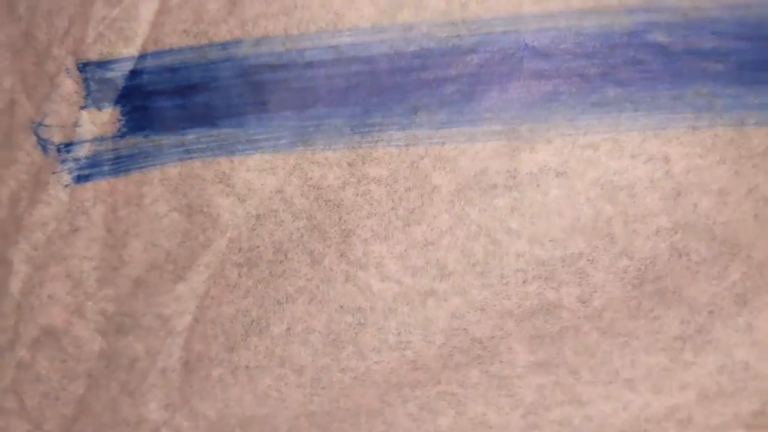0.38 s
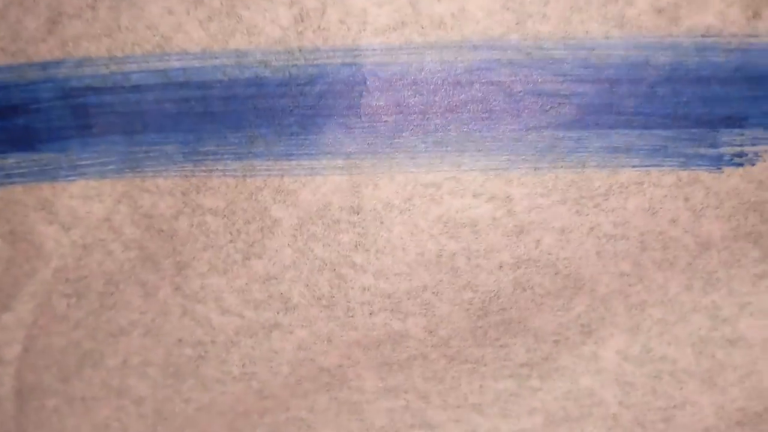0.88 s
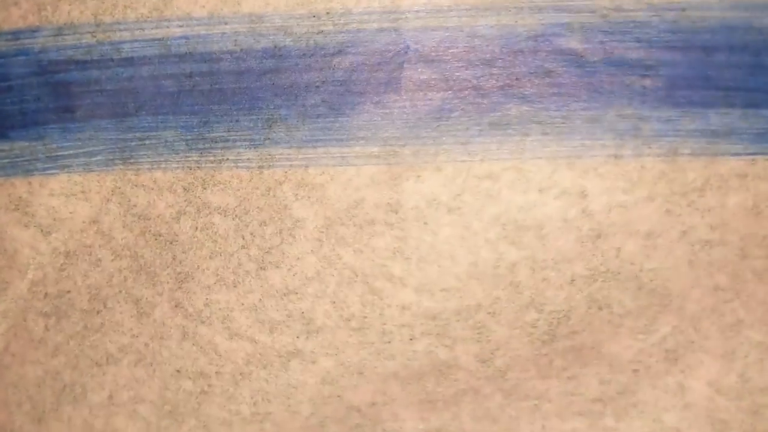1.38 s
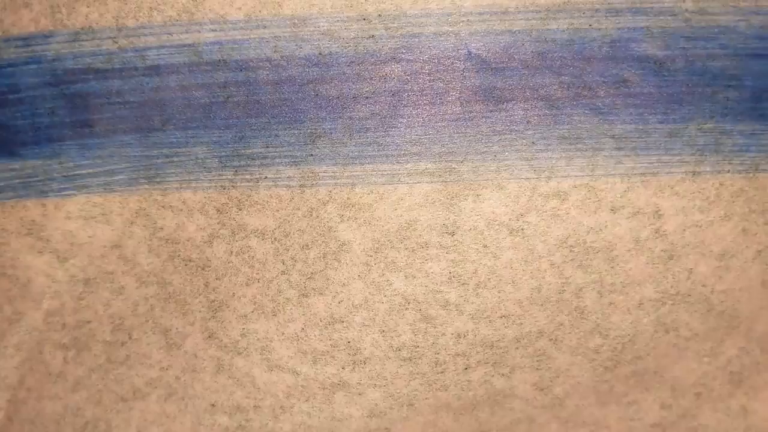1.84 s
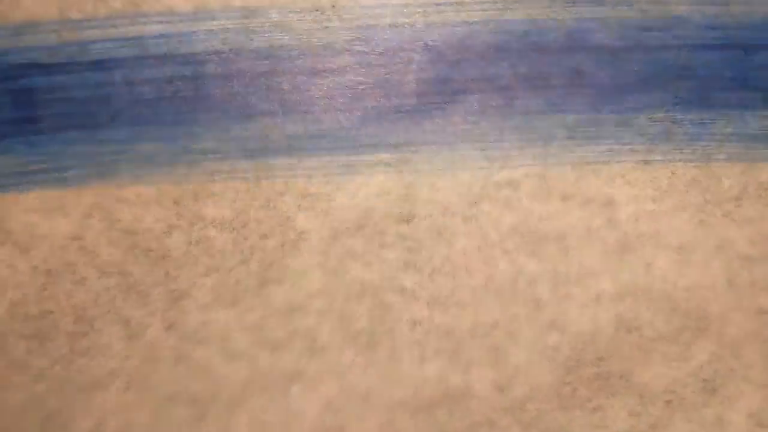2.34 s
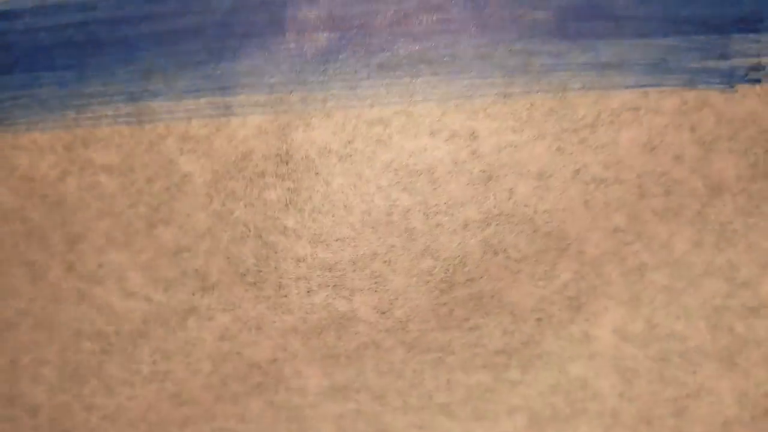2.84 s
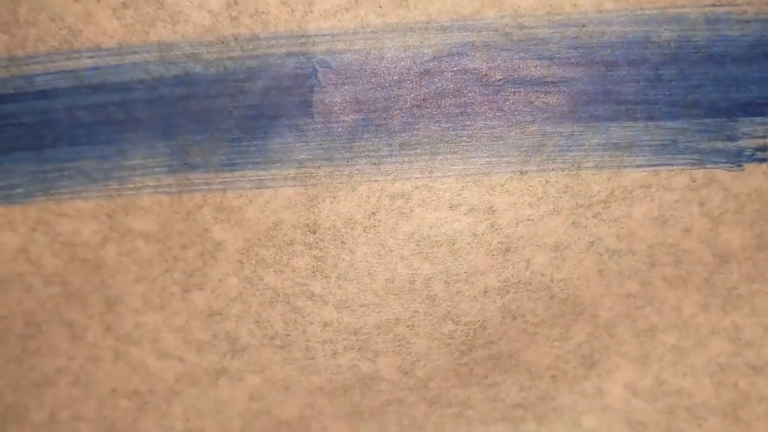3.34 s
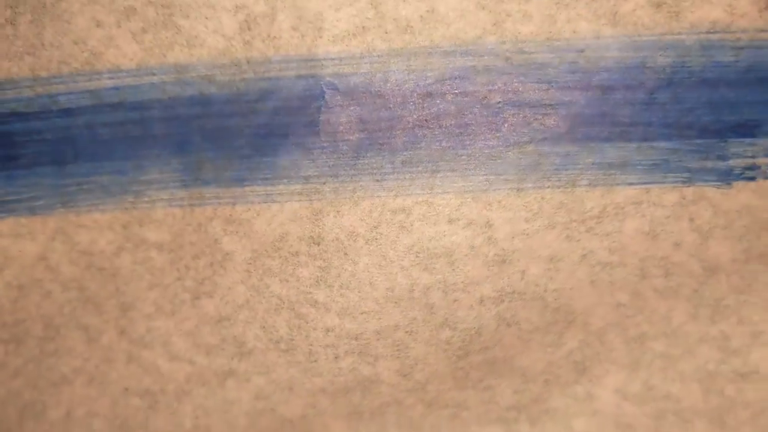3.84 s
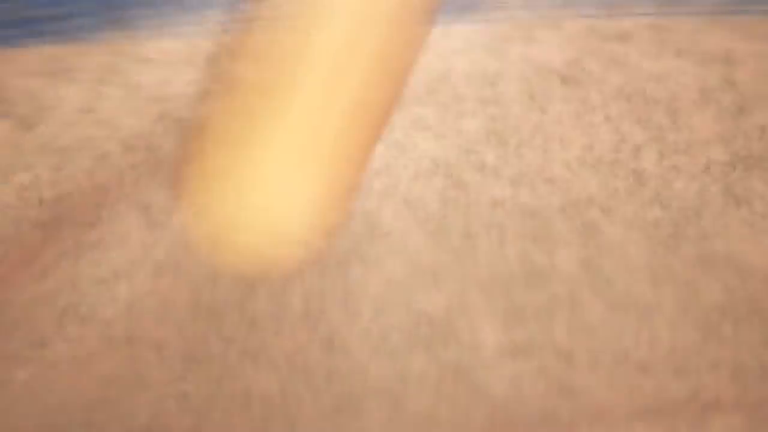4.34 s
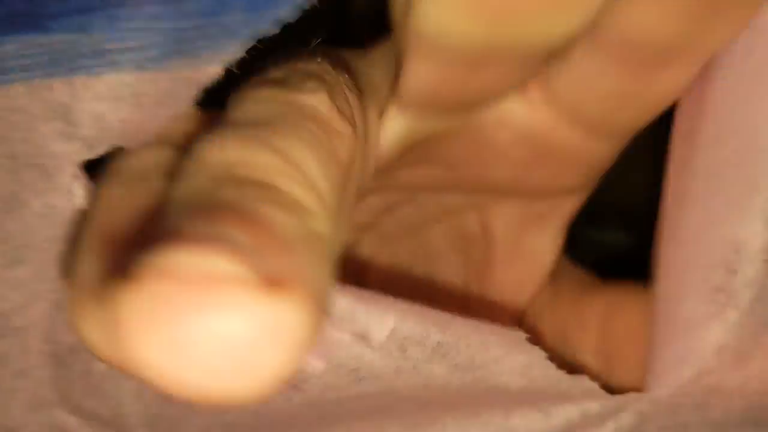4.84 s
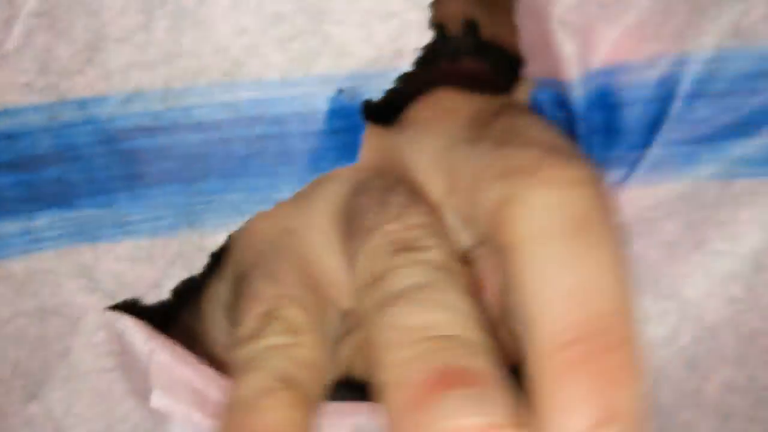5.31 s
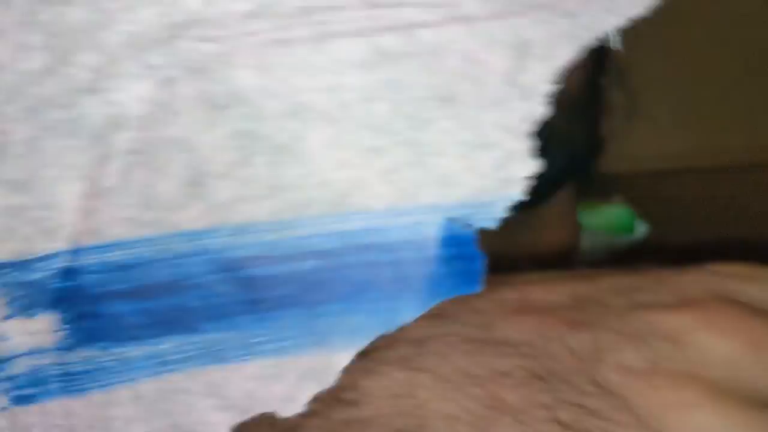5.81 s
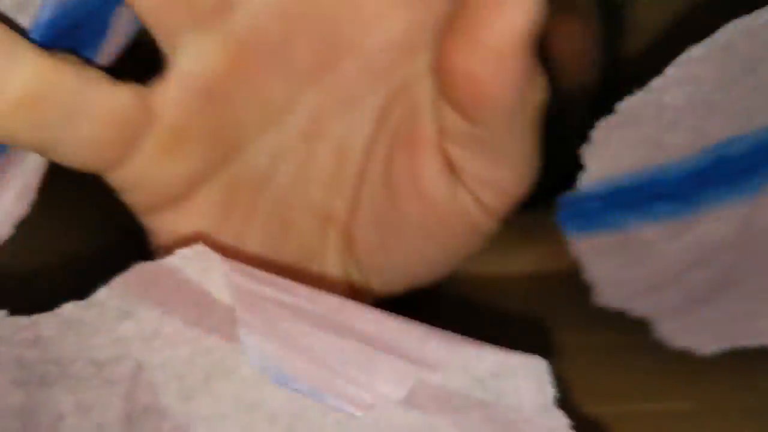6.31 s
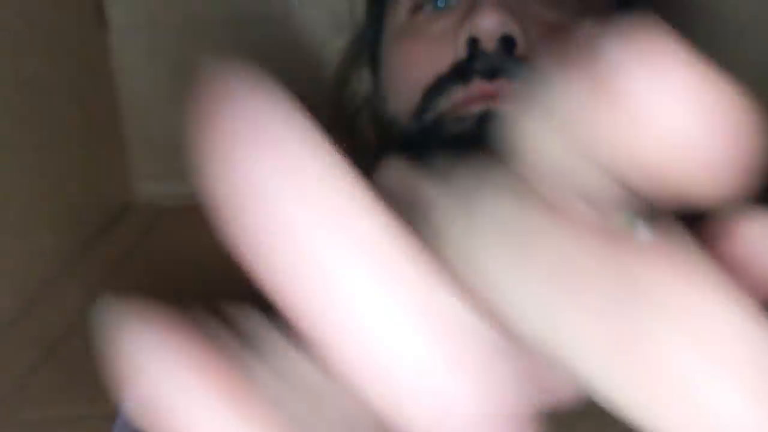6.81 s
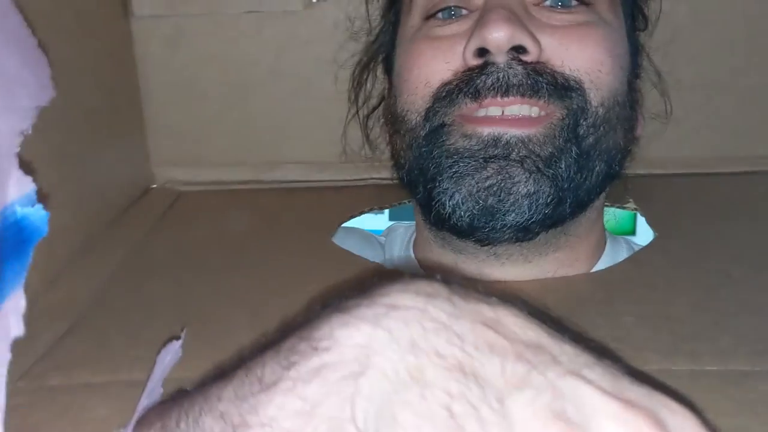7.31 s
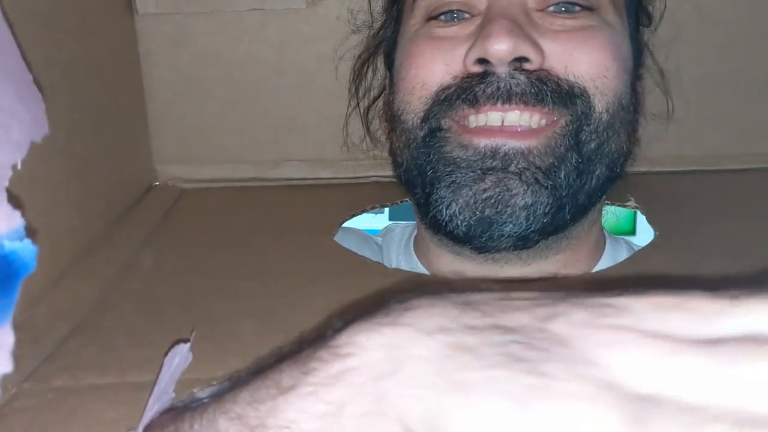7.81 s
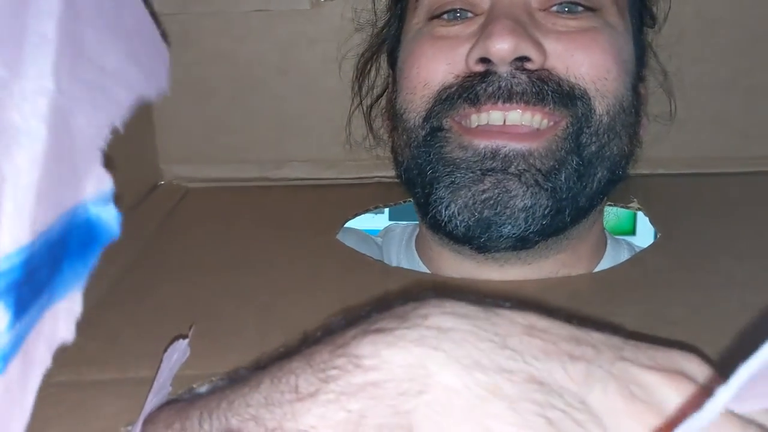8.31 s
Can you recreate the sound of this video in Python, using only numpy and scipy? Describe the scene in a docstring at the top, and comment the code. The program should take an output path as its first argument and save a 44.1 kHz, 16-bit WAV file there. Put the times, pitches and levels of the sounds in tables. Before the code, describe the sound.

Crisp paper crackle and tiny clinks give way to fuller tearing, a short hush, then violent rips and dull box thumps, ending in quiet rustles.

```python
"""Thin paper stretched over a cardboard box is handled right at a pair of microphones.
First it crinkles thinly while something small and hard clinks nearby; then the sheet slackens and
tears more broadly, and after a lull the tearing grows loud and the box booms along. The paper is
thousands of tiny noise clicks that follow the hand's moves, with snaps and dry ticks on top; clinks and
bumps are decaying tones. Short echoes of the box, a low rumble and the quiet room lie around it."""
import sys
import numpy as np
from scipy import signal
from scipy.fft import rfft, irfft
from scipy.io import wavfile

SR = 44100
rng = np.random.default_rng(int(sys.argv[2]) if len(sys.argv) > 2 else 0)


def field_ratio(decibels):
    """Amplitude ratio for a level in dB (20 dB per decade); scalars and array-likes work."""
    return 10 ** (np.asarray(decibels, dtype=float) / 20)


def wav_record(signal):
    """Record a signal, one row per channel, as 16-bit PCM in the file named by sys.argv[1]."""
    frames = np.transpose(np.atleast_2d(signal))
    bounded = np.clip(frames, -1, 1)
    # unit amplitude maps onto the largest positive 16-bit level
    quanta = np.round(bounded * 32767).astype(np.int16)
    wavfile.write(sys.argv[1], SR, quanta)


N = 371189  # length in samples

# creases that give way at once: (time [s], relative level [dB], pitch [Hz])
SNAP_EVENTS = [(0.018, -3.5, 7000), (0.1048, -7, 6500), (0.1507, -8, 6500), (0.438, -10.5, 5540),
               (0.553, -18, 6230), (0.5939, -11, 6800), (0.785, -17.5, 6200), (0.925, -13, 5850),
               (0.958, -11.5, 5500), (1.1764, -16.5, 5200), (1.238, -19, 6400), (1.5483, -5, 5350),
               (1.6216, -8, 5140), (1.6554, -5, 3220), (1.6944, -6.5, 6400), (1.768, -10, 6240),
               (1.878, -26.5, 4700), (2.3374, -12, 2290), (2.367, -2.5, 1500), (3.1615, -20, 2220),
               (3.895, -23.5, 3900), (3.9763, -20, 1870), (4.0617, -22, 1660), (4.4179, -4, 3460),
               (4.758, -7, 2630), (5.108, -13, 3230), (5.943, -6, 2360), (6.058, -22, 4530),
               (7.4792, -23.5, 3400), (7.8246, -17.5, 2577), (7.8992, -15.5, 3280)]
# single fibres that part with a dry tick: (time [s], relative level [dB])
TICK_EVENTS = [(0.1974, -11), (1.5978, -12), (2.1839, -15), (2.2084, -14), (2.2408, -12), (2.3101, -16),
               (2.4488, -12), (2.4982, -15), (5.2714, -22), (5.4424, -14), (5.4614, -16), (5.4879, -14),
               (5.5468, -13), (6.4872, -13), (7.2823, -17), (7.2993, -14), (7.7558, -14)]
# small hard clinks: (time [s], relative level [dB], pitch the blow favours [Hz])
CLINK_EVENTS = [(.122, -31.5, 1960), (0.118, -22, 3185), (0.36, -46, 1350), (0.44, -28, 3185),
                (.965, -27.5, 2340), (.965, -33, 3760), (1.11, -34, 2850), (1.18, -31.5, 2850),
                (1.301, -41, 2850), (1.553, -37, 1960), (1.651, -21.5, 3185), (1.653, -32, 1960),
                (1.661, -31, 4370), (1.713, -34.5, 1350), (1.769, -32.5, 1960), (1.812, -28, 4370),
                (1.836, -28, 3185), (2.335, -21, 2340), (2.4, -23, 2340)]
# tones of the clinking thing: (pitch [Hz], time to fade by 60 dB [s])
CLINK_TONES = [(1350, 0.16), (1960, 0.13), (2340, 0.063), (2850, 0.058), (3185, 0.11), (3760, 0.069),
               (4370, 0.076)]
# bumps on the box: (time [s], relative level [dB], contact passes up to [Hz], hand rubs on for [s])
BUMP_EVENTS = [(1.256, -36, 72, 0.08), (2.369, -18, 1510, 0.005), (4.147, -37, 147, 0.28),
               (4.418, -13, 800, 0.0052), (4.776, -19, 800, 0.015), (5.08, -26, 500, 0.0042),
               (6.345, -26.5, 407, .17), (7.288, -29, 200, 0.02), (8.18, -33.5, 127.3, 0.03)]
# tones of the box: (pitch [Hz], relative level [dB], time to fade by 60 dB [s])
BOX_TONES = [(29.1, -10, 0.4), (113, -5.5, 0.048), (211, -3.5, 0.055), (431, -6, 0.078)]
# how the sheet is held: (time [s], rustle between moves [dB], left minus right [dB],
# fullness: low crackle against the rustle [dB])
GRIP_CURVE = [(0, -66, -1.5, -27), (.5, -41, -1, -28.5), (.95, -32, -1, -42), (1.35, -46, -1.5, -23),
              (1.9, -38.5, -1.5, -37.5), (2.15, -30.5, 0, -36.5), (2.365, -33, -1.5, -17),
              (2.6, -44.5, 0.5, 1.5), (3.36, -46.5, 2.5, -8), (3.46, -59, 4, -10.5), (3.8, -71, 0, -7.5),
              (4.35, -43, 2.5, -4.5), (5.1, -72, 1.5, -8), (5.85, -68, -1, -8), (6.2, -59, 0.5, -8),
              (6.45, -40, 4, -6.5), (6.62, -81, 1.5, -8.5), (6.95, -58, -0.5, -9), (8.42, -52, -2, -10)]
# where the hand works: (time [s], delay of the left microphone [ms])
HAND_CURVE = [(0, 0.26), (.6, -.2), (6.8, -.25), (7.2, 0.18)]
# pulls that build up gradually: (time of full effort [s], hold [s], rustle level [dB], fall [dB/s])
PULL_MOVES = [(0, 0.14, -26, 164), (.4, 0.0047, -26, 86.5), (.609, 0.0053, -29, 183),
              (.848, 0.042, -34.5, 46), (1.711, 0.0075, -21, 146), (2.06, 0.4675, -29, 1196.5),
              (2.998, 0.0025, -32.5, 150), (4.605, 0.01, -32.5, 48), (4.969, 0.11, -25, 252),
              (5.223, 0.0047, -34, 80), (5.37, 0.03, -32.5, 62), (5.602, 0.00162, -25, 236),
              (7.035, 0.024, -33, 42), (7.58, 0.076, -38.5, 100), (5.855, 0.018, -18, 496),
              (7.752, 0.0078, -32.5, 114), (8, .14, -44, 497)]
# jerks that start almost at once: (time of full effort [s], hold [s], rustle level [dB], fall [dB/s])
JERK_MOVES = [(2.7, 0.14, -33, 500), (2.83, 0.013, -28.5, 529), (3.163, 0.011, -38.5, 491),
              (3.845, .01, -43, 3), (4.158, 0.014, -26, 134), (4.424, 0.0083, -18.5, 182),
              (4.764, 0.023, -16, 700), (4.81, 0.0184, -28.5, 154), (5.418, 0.026, -25, 248),
              (5.758, 0.0055, -19, 900), (5.798, 0.064, -25.5, 77), (5.89, 0.011, -20, 898),
              (5.947, 0.016, -23, 450), (6.062, 0.062, -37, 400), (6.336, 0.0066, -18, 119),
              (6.41, 0.12, -25, 259), (6.942, .05, -40, 30), (7.15, 0.013, -28, 450),
              (7.234, 0.0088, -25, 139), (7.822, 0.029, -28, 204), (7.9, 0.0071, -29.5, 213),
              (8.27, 0.059, -43, 202)]
# spans where the rustle is stronger at 1.5-3 kHz: (start [s], length [s], lift [dB])
MIDDLE_LIFTS = [(0.682, 0.94, 6.5), (2.172, 1.22, 4.5)]
# colour of the sheet crinkling: (frequency [Hz], relative level per Hz [dB])
CRINKLE_COLOUR = [(1500, -17), (2300, -12), (3300, -7.5), (5500, 1), (8000, -5), (11500, -7), (14500, -24),
                  (16500, -28)]
# colour of the sheet tearing: (frequency [Hz], relative level per Hz [dB])
TEAR_COLOUR = [(1500, -1), (3000, -0.5), (5000, -1), (7500, -9), (10500, -0.5), (13500, -8), (16500, -11.5)]
# colour of the low crackle: (frequency [Hz], relative level per Hz [dB])
LOW_CRACKLE_COLOUR = [(200, -1), (350, -5.5), (700, 0), (1500, 0.5)]
# colour of the room at rest: (frequency [Hz], relative level [dB])
HUSH_COLOUR = [(15, -40), (25, 4), (65, -4), (263, -15.5), (16000, -40.5)]

HUSH_DB = -56  # overall level of the room at rest
TAUT_END_S, SLACK_S = 2.2, 2.55  # end of the taut hold; start of the broad tearing colour
TAUT_MEAN_DB, TAUT_LAG = -23, 0.49  # while taut, the low crackle trails the rustle's swings by this share
PULL_RISE_DB_PER_S, JERK_RISE_DB_PER_S = 103, 1100
EVEN_DB, CLUMPY_DB = -20, -39  # rustle levels that set the scale from even to clumpy clicks
LEAD_DB = -5  # the tick that opens a snap, against the snap's listed level
MIC_SPREAD_S = .00025  # largest change of the delay between microphones over the working part of the sheet
LIFT_EDGE_S, LIFT_REST_DB = 0.15, -0.5
BOX_T60_S, BOX_WET_DB = 0.036, -6
RUMBLE_DB, RUMBLE_IGNORES = -9.5, 0.47  # offset of the rumble; share of the fullness that it ignores
SHUDDER_DB, SHUDDER_T60_S = -5, 0.14  # shudder against the bump's listed level
SHUDDER_LOW_HZ, SHUDDER_TOP_HZ = 34.4, 394


def rms_one(x):
    """Scale to an average (rms) strength of 1."""
    return x / np.sqrt(np.mean(x ** 2) + 1e-20)


def in_time(rows):
    """Draw straight lines between the rows of a time table: one value per sample for each column."""
    s, *columns = np.transpose(rows)
    return [np.interp(np.arange(N) / SR, s, c) for c in columns]


def at_hz(points, hz):
    """Read a colour table at hz, with frequency spaced by ratio as the ear hears it."""
    table_hz, table_db = np.transpose(points)
    return np.interp(np.log(hz), np.log(table_hz), table_db)


def band(x, low_hz, high_hz):
    """Let through only the range between two frequencies."""
    sos = signal.butter(2, [low_hz, high_hz], "band", fs=SR, output="sos")
    return signal.sosfilt(sos, x + 1e-18)


def fade(x, t60):
    """Each spike in x leaves a trail that fades by 60 dB in t60 seconds."""
    return signal.lfilter([1], [1, -field_ratio(-60 / (t60 * SR))], x)


def ring(clicks, hz, t60):
    """A struck tone: each click of height 1 starts a fading sine of height 1."""
    r, w = field_ratio(-60 / (t60 * SR)), 2 * np.pi * hz / SR
    return signal.lfilter([0, np.sin(w)], [1, -2 * r * np.cos(w), r * r], clicks + 1e-18)


def hush():
    """The quiet room and the microphones' own hiss: steady noise, alike left and right only in the bass."""
    hz = np.maximum(np.arange(N // 2 + 1) * SR / N, 1)
    mid, side = rfft(rng.standard_normal((2, N)))
    side = side / np.sqrt(1 + (700 / hz) ** 2)
    spectrum = (mid + side * [[1], [-1]]) * field_ratio(at_hz(HUSH_COLOUR, hz))
    return field_ratio(HUSH_DB) * rms_one(irfft(spectrum, N))


def rumble(low_db, apart, lag_s):
    """Low noise that follows the handling sluggishly, mostly shared by both microphones."""
    r = np.exp(-1 / (lag_s * SR))
    level = signal.lfilter([1 - r], [1, -r], field_ratio(low_db))
    mid, side = rng.standard_normal((2, N))
    deep = rms_one(band(mid + apart * side * [[1], [-1]], 33.6, 38.5))
    boom = rms_one(band(mid + apart / 2 * side * [[1], [-1]], 64, 185))
    return level * rms_one(deep + 0.92 * boom)


def box(x):
    """Dense short echoes between the cardboard walls, in a new random pattern every twelfth of a second."""
    step, t = SR // 12, np.arange(SR // 8) / SR
    out = np.zeros((2, N + step + len(t)))
    for i in range(0, N, step):
        echoes = rng.standard_normal((2, len(t))) * field_ratio(-60 * t / BOX_T60_S) * (t > .001)
        echoes = echoes / np.linalg.norm(echoes, axis=1, keepdims=True)
        wet = signal.fftconvolve(x[:, i:i + step], echoes, axes=1)
        out[:, i:i + wet.shape[1]] += wet
    return out[:, :N]


def bump_tones(level_db, apart):
    """Dull blows ring the walls and air of the box; a soft contact hardly reaches the high tones."""
    s, bump_db, soft_hz, rub_s = np.transpose(BUMP_EVENTS)
    chance = rng.standard_normal((len(BOX_TONES), 2, len(s)))
    at, side = np.round(s * SR).astype(int), np.array([[.5], [-.5]])
    out = np.zeros((2, N))
    for (hz, tone_db, t60), (luck_db, lean) in zip(BOX_TONES, chance):
        strength = field_ratio(bump_db + level_db + tone_db + luck_db) / (1 + (hz / soft_hz) ** 2)
        strength = strength * (1 + apart * lean * side)  # a random lean to left or right
        blows = np.array([np.bincount(at, g, N) for g in strength])
        out += ring(blows, hz, t60)
    return out


def shudders(apart):
    """The walls shudder as low noise while the hand rubs on, then the shudder fades."""
    t, side = np.arange(N) / SR, np.array([[.5], [-.5]])
    mid, other = rng.standard_normal((2, N))
    out = np.zeros((2, N))
    for s, bump_db, soft_hz, rub_s in BUMP_EVENTS:
        fade_db = 60 * np.maximum(t - s - rub_s, 0) / SHUDDER_T60_S
        level = (t > s) * field_ratio(bump_db + SHUDDER_DB - fade_db)
        top_hz = np.clip(soft_hz, 2 * SHUDDER_LOW_HZ, SHUDDER_TOP_HZ)
        out += level * rms_one(band(mid + apart * other * side, SHUDDER_LOW_HZ, top_hz))
    return out


def clinks(sheet, reach_db, buzz_db, rattle_t60):
    """Each blow rings most in tones near the pitch it favours; the sheet keeps them buzzing for a while."""
    s, blow_db, favoured_hz = np.transpose(CLINK_EVENTS)
    at = np.round(s * SR).astype(int)
    out = np.zeros(N)
    for hz, t60 in CLINK_TONES:
        off_db = reach_db * np.abs(np.log2(hz / favoured_hz))  # reach_db is the loss per octave
        blows = np.bincount(at, field_ratio(blow_db - off_db), N)
        touch = np.sqrt(fade(blows + 1e-18, rattle_t60))  # the root halves the fade: 30 dB in rattle_t60
        out += ring(blows + field_ratio(buzz_db) * touch * sheet[0], hz, t60)
    return out


def effort():
    """Rustle and fullness in dB: every move rises, holds and dies away, on top of the rest between moves."""
    t = np.arange(N) / SR
    rest_db, pan_db, full_db = in_time(GRIP_CURVE)
    power = field_ratio(rest_db) ** 2
    for moves, rise in ((PULL_MOVES, PULL_RISE_DB_PER_S), (JERK_MOVES, JERK_RISE_DB_PER_S)):
        for s, held, move_db, fall in moves:
            below_db = rise * np.maximum(s - t, 0) + fall * np.maximum(t - s - held, 0)
            power = power + field_ratio(move_db - below_db) ** 2
    rustle_db = 10 * np.log10(power)
    trailing_db = TAUT_LAG * (rustle_db - TAUT_MEAN_DB) * (t < TAUT_END_S)
    return rustle_db, full_db - trailing_db


def middle_lift():
    """Spans where the rustle is stronger at 1.5-3 kHz: the gain in dB, with sloping edges."""
    t = np.arange(N) / SR
    gain_db = np.full(N, LIFT_REST_DB)
    for s, length, span_db in MIDDLE_LIFTS:
        gain_db += span_db * np.clip(np.minimum(t - s, s + length - t) / LIFT_EDGE_S, 0, 1)
    return gain_db


def clumps(per_s, t60, spread_db, rest):
    """One crease sets off its neighbours: activity jumps up at random and dies away; rms 1."""
    sizes = field_ratio(spread_db * np.minimum(rng.exponential(1, N), 2.5))
    starts = (rng.random(N) < per_s / SR) * sizes
    return rms_one(rest + fade(starts, t60))


def patches(count, patchy_db, per_s):
    """Other parts of the sheet take turns: a wandering gain per band, shared with its neighbours."""
    steps = int(N / SR * per_s) + 2
    chance = rng.standard_normal((count + 2, steps))
    chance = (chance[2:] + chance[1:-1] + chance[:-2]) / np.sqrt(3)
    places = np.linspace(0, N, steps)
    return [field_ratio(patchy_db * np.interp(np.arange(N), places, c)) for c in chance]


def snaps(at, hz, level_db, t60, reach_db):
    """Creases giving way: the power they add to clicks at samples `at`, strongest near each one's pitch."""
    power = np.zeros(len(at))
    for s, snap_db, pitch in SNAP_EVENTS:
        inside = np.flatnonzero((at >= s * SR) & (at < (s + t60) * SR))
        off_db = reach_db * abs(np.log2(max(hz, 1500) / pitch))
        fade_db = 60 * (at[inside] / SR - s) / t60
        power[inside] += field_ratio(snap_db + level_db - off_db - fade_db) ** 2
    return power


def ticks(level_db, t60, taut_hz, slack_hz, top_hz):
    """Parting fibres, and one to open each snap: tiny noise puffs, thin at first, fuller once slack."""
    t, out = np.arange(SR // 50) / SR, np.zeros((2, N + SR))
    openers = [(s, snap_db + LEAD_DB) for s, snap_db, pitch in SNAP_EVENTS]
    for s, tick_db in TICK_EVENTS + openers:
        noise = rng.standard_normal(len(t)) + rng.standard_normal((2, len(t)))  # half shared, half apart
        puff = band(noise * field_ratio(-60 * t / t60), taut_hz if s < SLACK_S else slack_hz, top_hz)
        out[:, round(s * SR):][:, :len(t)] += field_ratio(tick_db + level_db) * puff / np.abs(puff).max()
    return out[:, :N]


def paper(rustle_db, full_db, lift_db, per_s, spread_db, broad, snap_db):
    """Fibre clicks from all over the sheet; each reaches the two microphones at its own moments."""
    # the stronger the rustle, the more evenly the clicks run together
    loose = np.clip((rustle_db - EVEN_DB) / (CLUMPY_DB - EVEN_DB), .35, .7)
    power = (field_ratio(rustle_db) * clumps(per_s=150, t60=0.017, spread_db=3.5, rest=0.92) ** loose) ** 2

    at = np.flatnonzero(rng.random(N) < per_s / SR)
    sizes = field_ratio(spread_db * np.minimum(rng.exponential(1, len(at)), 4))
    delay_s = in_time(HAND_CURVE)[0][at] / 1000 + rng.uniform(-1, 1, len(at)) * MIC_SPREAD_S
    half_lag = np.round(delay_s * SR / 2).astype(int)
    places = np.clip([at + half_lag, at - half_lag], 0, N - 1)

    edges = np.geomspace(200, 18000, 17)  # 16 bands [Hz]
    centres, widths = np.sqrt(edges[1:] * edges[:-1]), np.diff(edges)
    is_low, is_middle = centres < 1500, (centres > 1500) & (centres < 3000)

    def shares(colour, used):
        """Split a strength of 1 over the bands used."""
        s = field_ratio(at_hz(colour, centres)) * np.sqrt(widths) * used
        return s / np.linalg.norm(s)

    crinkle, tear = shares(CRINKLE_COLOUR, ~is_low), shares(TEAR_COLOUR, ~is_low)
    crackle = shares(LOW_CRACKLE_COLOUR, is_low)
    patch = patches(count=16, patchy_db=2.5, per_s=30)
    out = np.zeros((2, N))
    for k, (low_hz, high_hz) in enumerate(zip(edges, edges[1:])):
        # makes the clicks about rms 1 after the band filter
        unit = np.sqrt(SR / 2 / widths[k] * N / np.sum(sizes ** 2) / (1 + broad ** 2))
        share = np.where(at < SLACK_S * SR, crinkle[k], tear[k]) * field_ratio(is_middle[k] * lift_db[at])
        share = share + crackle[k] * field_ratio(full_db[at])
        colour = broad + rng.standard_normal(len(at))  # every click has a colour of its own
        snap_power = snaps(at, centres[k], snap_db, t60=0.063, reach_db=6.0)
        level = np.sqrt(power[at] * patch[k][at] ** 2 + snap_power)
        heights = unit * level * share * sizes * colour
        clicks = np.array([np.bincount(p, heights, N) for p in places])
        out += band(clicks, low_hz, high_hz)
    return out


def scene():
    """Paper sounds echo inside the box; clinks, bumps, rumble and hush reach the microphones directly."""
    rustle_db, full_db = effort()
    pan_db = in_time(GRIP_CURVE)[1]
    sheet = paper(rustle_db, full_db, middle_lift(), per_s=9000, spread_db=4.0, broad=0.32, snap_db=-4.0)
    sheet = sheet + ticks(level_db=2, t60=.01, taut_hz=4000, slack_hz=1200, top_hz=15000)
    near = sheet + field_ratio(BOX_WET_DB) * box(sheet)
    near = near + clinks(sheet, reach_db=105, buzz_db=-22, rattle_t60=.5)
    near = near * field_ratio(pan_db * [[.5], [-.5]])
    low_db = rustle_db + (1 - RUMBLE_IGNORES) * full_db + RUMBLE_DB
    bumps = bump_tones(level_db=3.5, apart=0.41) + shudders(apart=0.41)
    return near + bumps + rumble(low_db, apart=0.38, lag_s=0.028) + hush()


def low_pass(x):
    """Removes everything above the highest recorded frequency."""
    return signal.sosfilt(signal.butter(12, 15950, fs=SR, output="sos"), x)


def record(dry):
    """The loudest peaks are gently rounded off."""
    mix = 0.94 * np.tanh(dry / 1.004)
    return low_pass(mix)


dry = scene()
out = record(dry)
wav_record(out)
```